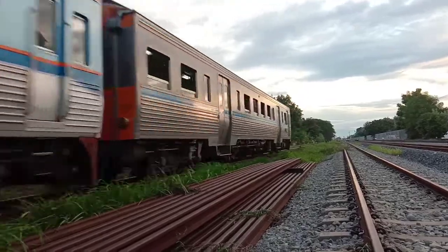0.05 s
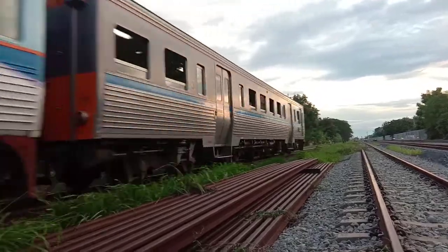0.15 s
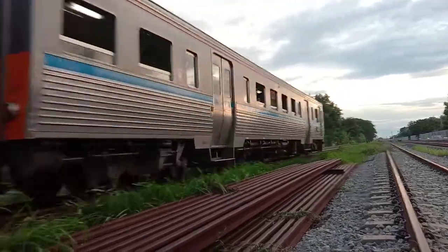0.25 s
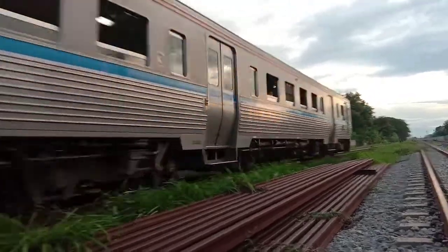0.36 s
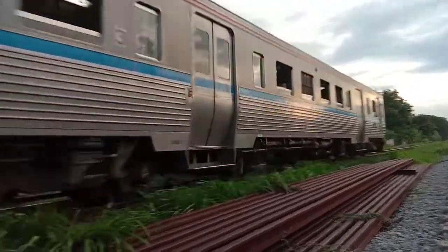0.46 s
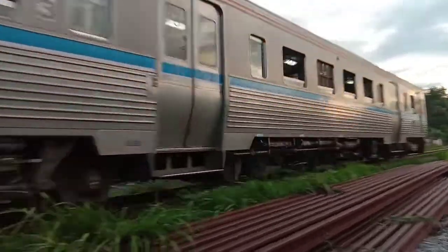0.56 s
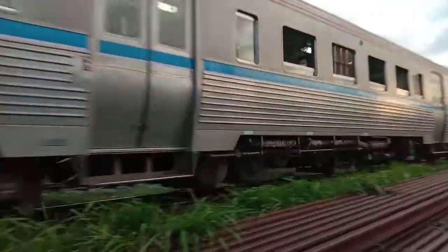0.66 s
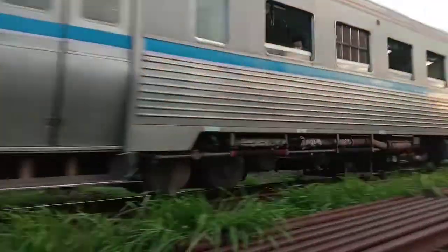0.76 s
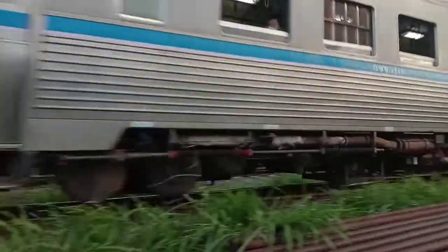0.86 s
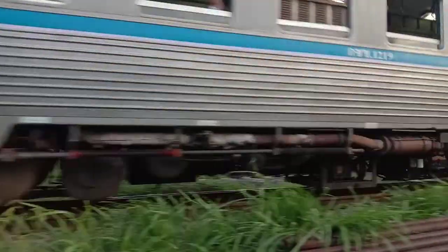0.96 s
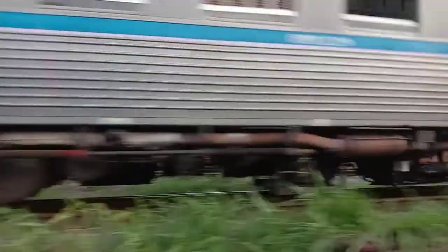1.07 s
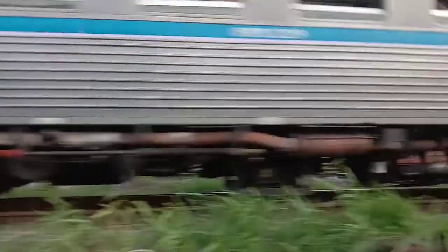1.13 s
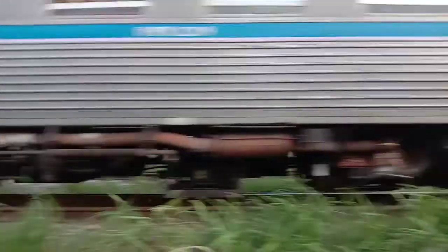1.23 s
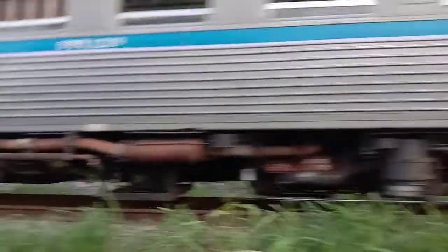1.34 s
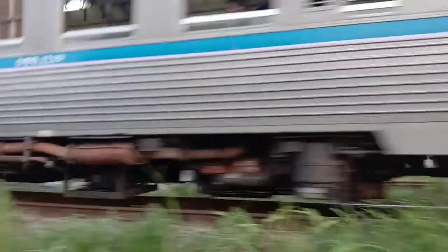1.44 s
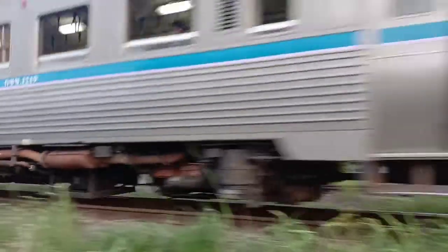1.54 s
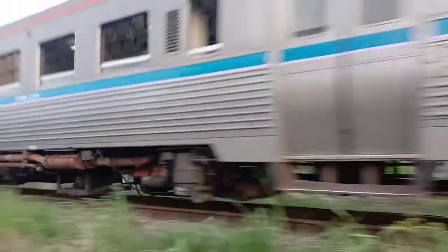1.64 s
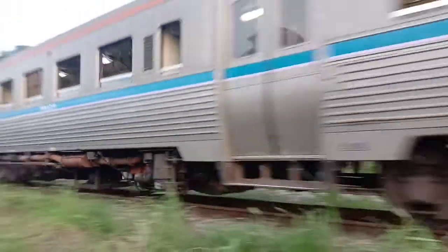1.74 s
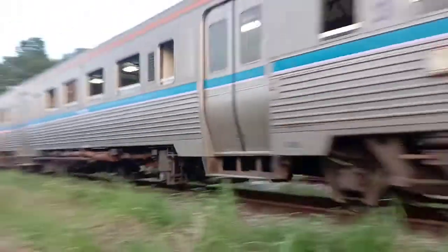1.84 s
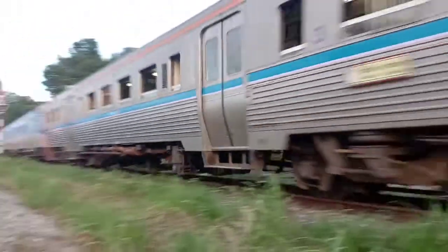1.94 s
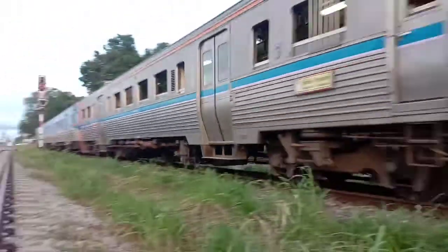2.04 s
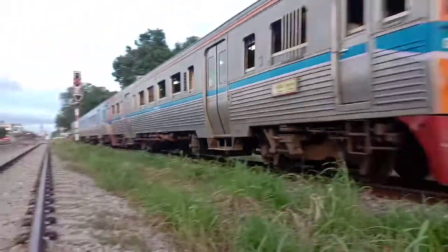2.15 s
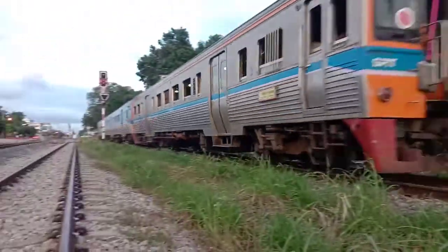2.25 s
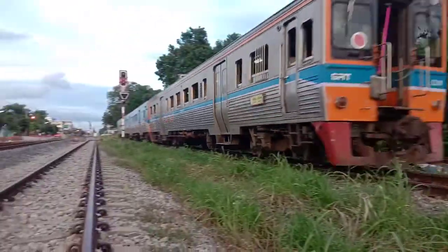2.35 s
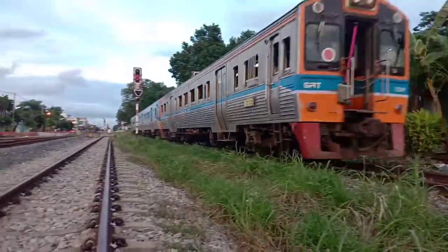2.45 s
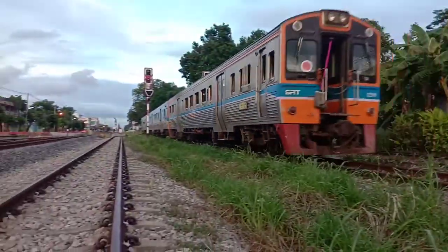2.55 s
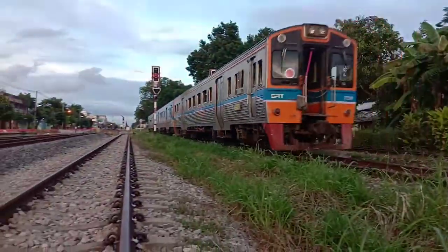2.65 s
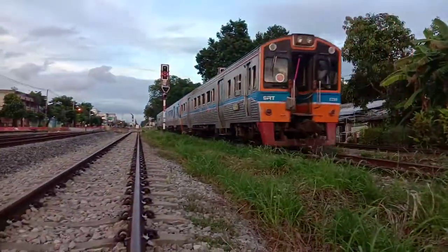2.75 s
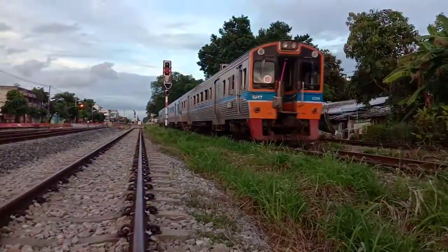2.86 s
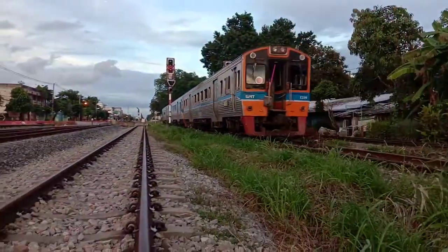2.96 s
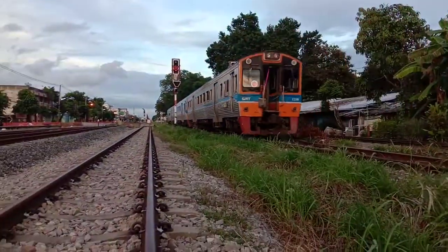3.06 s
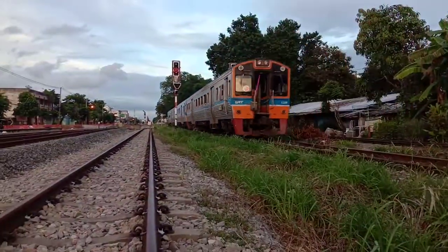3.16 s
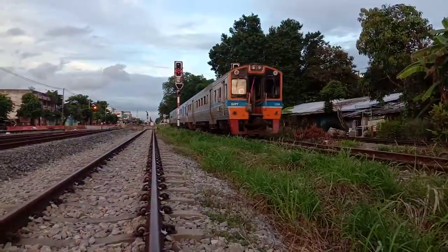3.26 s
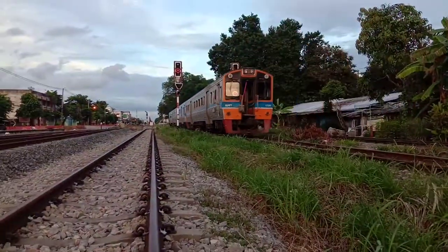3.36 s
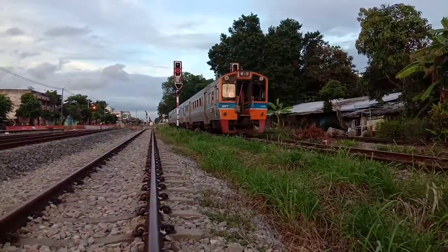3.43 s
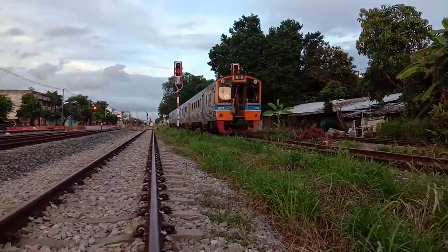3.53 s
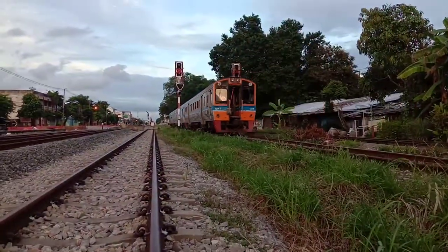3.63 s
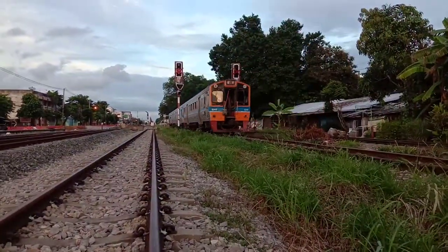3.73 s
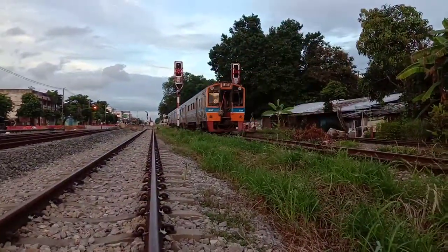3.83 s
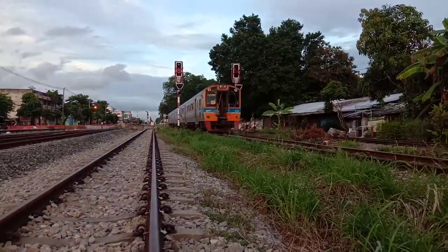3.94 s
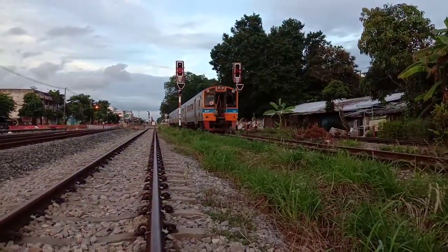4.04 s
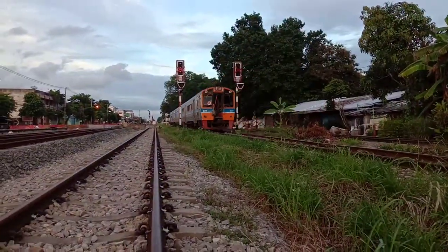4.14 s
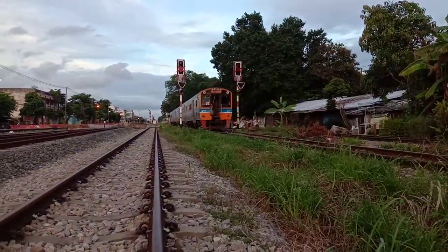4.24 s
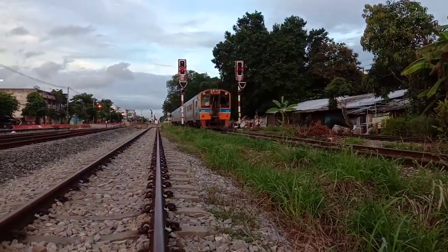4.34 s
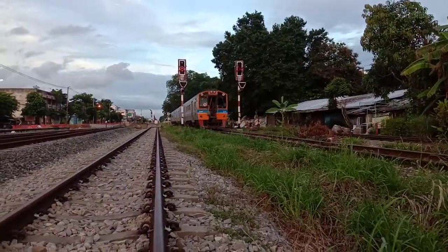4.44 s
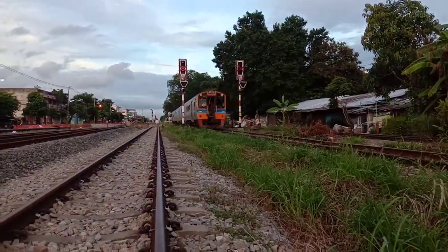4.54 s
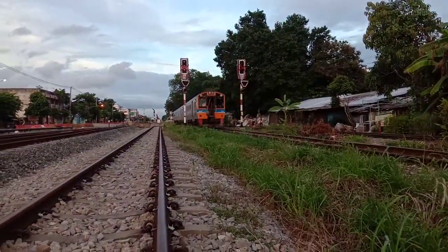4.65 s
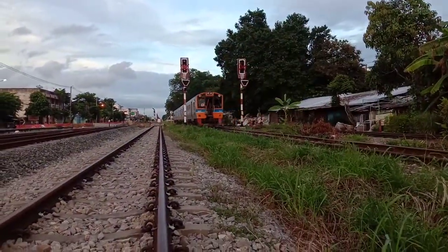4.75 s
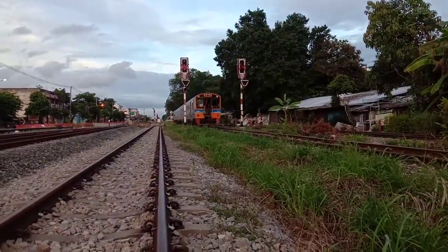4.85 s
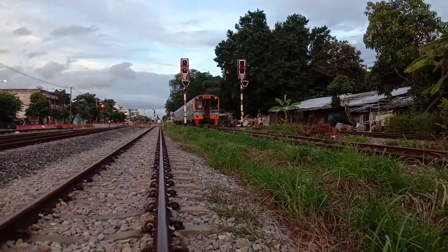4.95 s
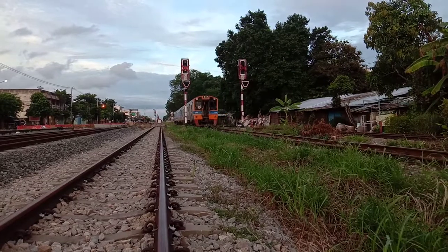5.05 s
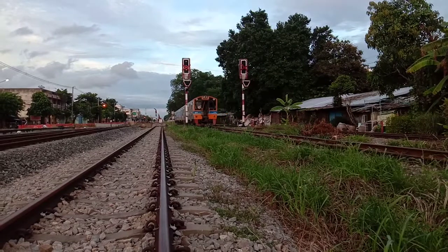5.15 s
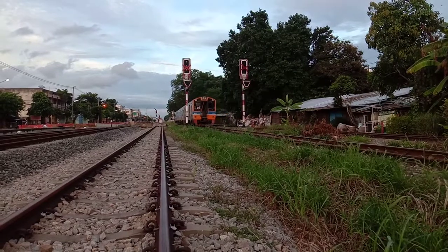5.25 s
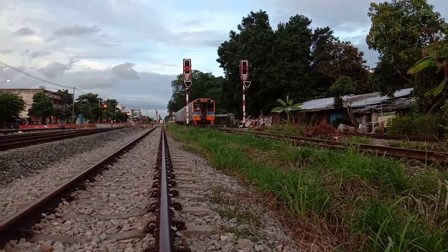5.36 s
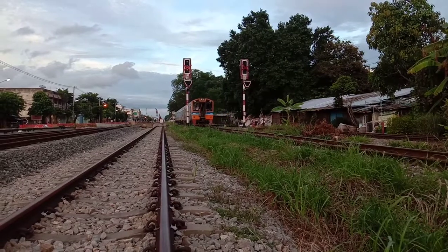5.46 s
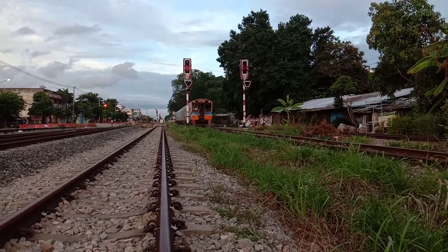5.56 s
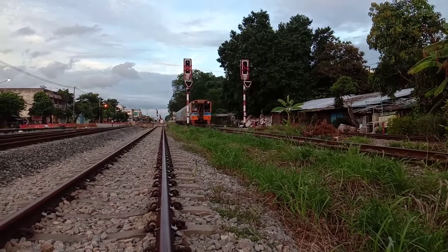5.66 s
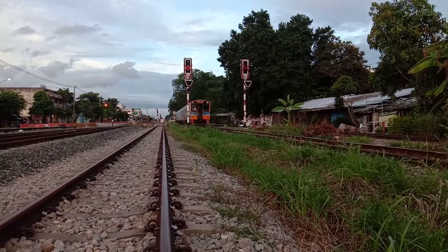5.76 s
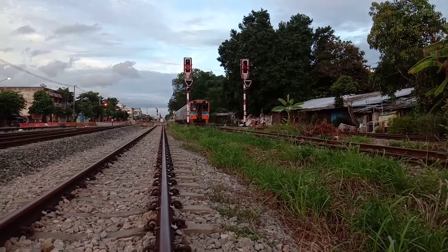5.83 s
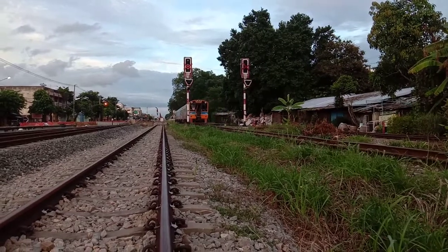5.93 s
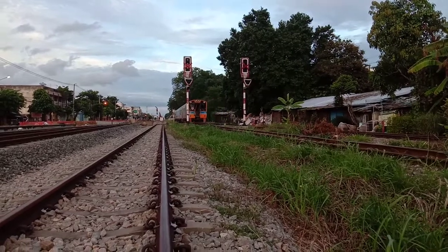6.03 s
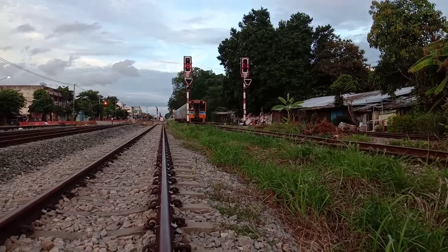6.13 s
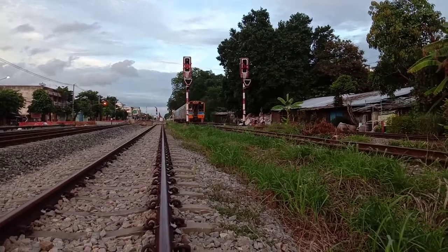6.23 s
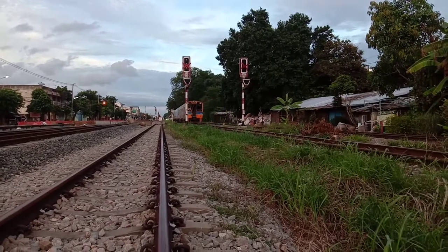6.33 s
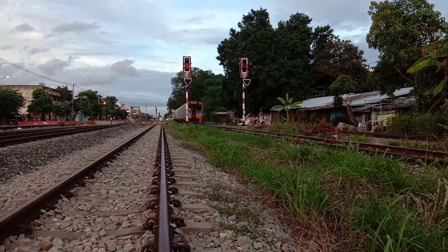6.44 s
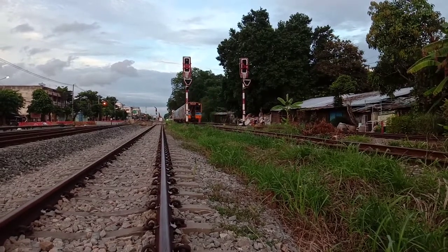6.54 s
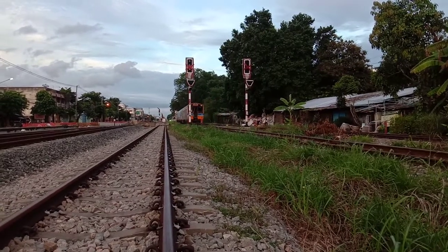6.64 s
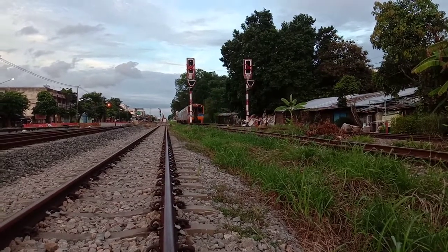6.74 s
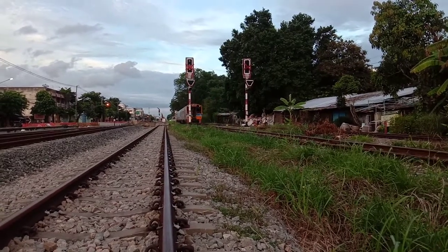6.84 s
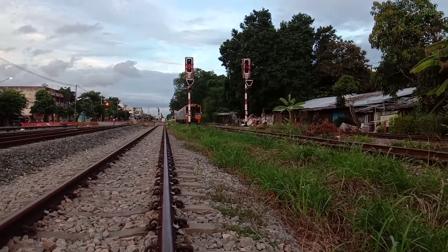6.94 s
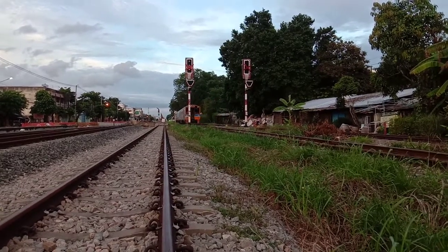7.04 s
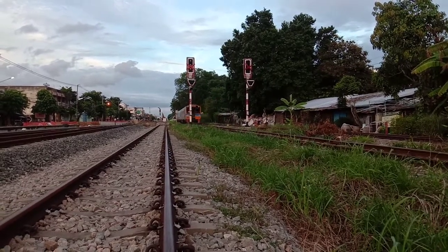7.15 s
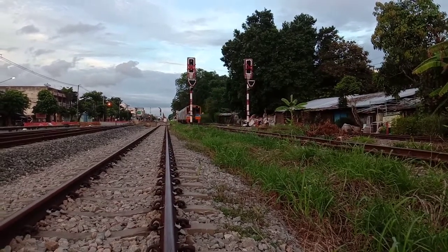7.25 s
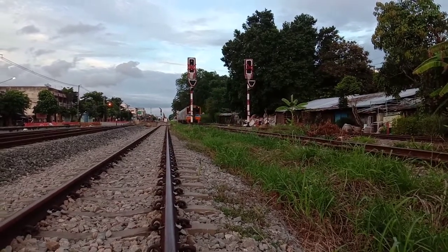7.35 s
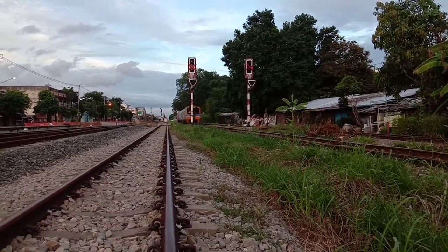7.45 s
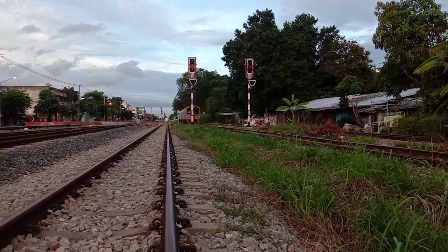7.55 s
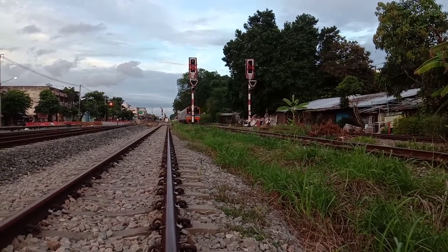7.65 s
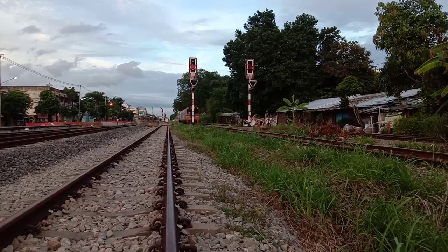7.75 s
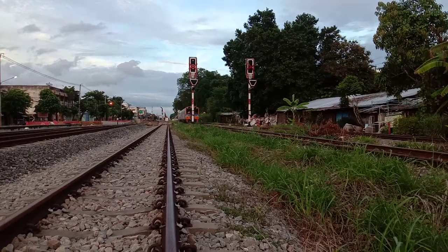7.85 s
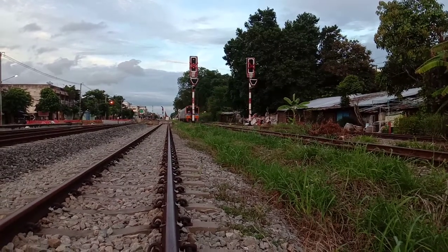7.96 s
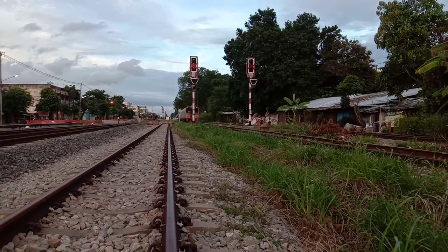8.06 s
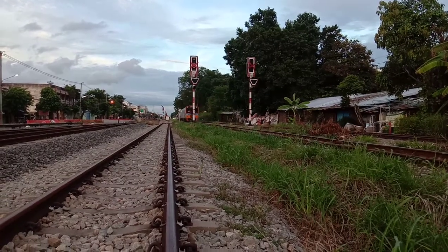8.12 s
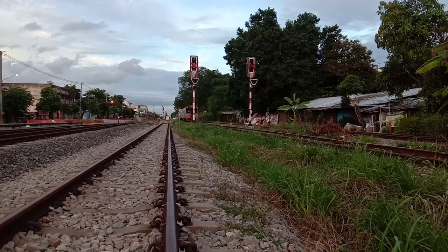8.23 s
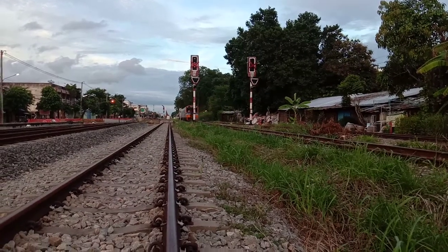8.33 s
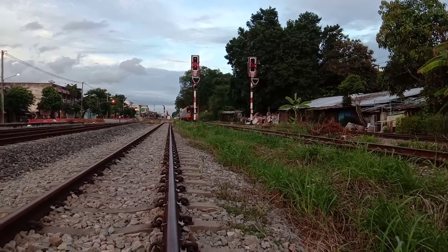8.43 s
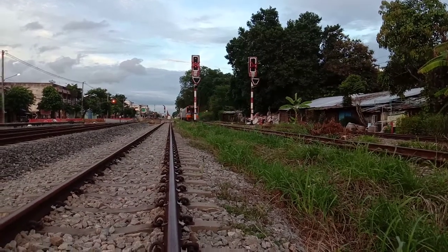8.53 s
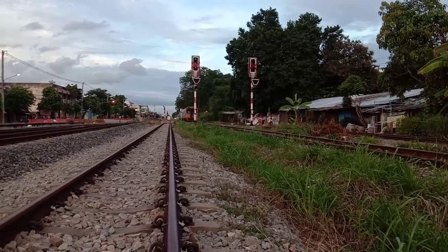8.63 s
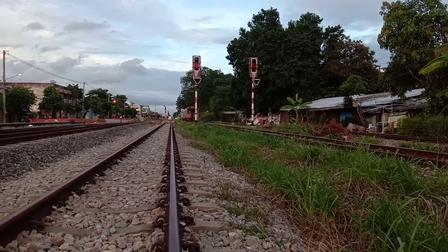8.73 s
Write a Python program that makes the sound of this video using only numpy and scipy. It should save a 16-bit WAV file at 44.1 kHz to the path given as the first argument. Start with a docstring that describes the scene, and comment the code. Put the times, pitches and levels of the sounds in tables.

```python
"""A hard clack of wheels on a rail joint opens the scene, in the close roar of a diesel railcar rolling away.
The roar is filtered noise for rails, car bodies, sleepers, hiss, highest treble and track bed, each with its level.
Joints are short bursts of noise, thumps of the track bed are a few low cycles, and squeals and hums are
sine tones with unsteady pitch. One microphone hears it all, and a limiter holds the hardest blows."""
import sys
import numpy as np
from scipy import signal
from scipy.fft import rfft, irfft, next_fast_len
from scipy.io import wavfile
from scipy.ndimage import uniform_filter1d, minimum_filter1d, map_coordinates

SR = 44100
rng = np.random.default_rng(int(sys.argv[2]) if len(sys.argv) > 2 else 0)


def put_to_file(sound):
    """Save the sound as 16-bit audio at rate SR, in the file named by the first command-line argument."""
    columns = np.atleast_2d(sound).T  # one column per channel
    safe = np.clip(columns, -1, 1)
    whole_steps = np.round(safe * 32767)
    wavfile.write(sys.argv[1], SR, whole_steps.astype(np.int16))


N = 387638  # length in samples
T = np.arange(N) / SR  # time in seconds
HZ = np.fft.rfftfreq(next_fast_len(N + 8192), 1 / SR)  # frequencies at which filters are drawn


def amp(db):
    """Turn decibels into a factor."""
    return 10 ** (np.asarray(db) / 20)


def unit(x):
    """Scale to an rms of 1."""
    return x / np.sqrt(np.mean(x ** 2) + 1e-20)


def gain(points):
    """Draw a filter through (Hz, dB) points on a log frequency axis, with -120 dB outside them."""
    hz, db = np.transpose(points)
    return amp(np.interp(np.log(HZ + 1), np.log(hz + 1), db, left=-120, right=-120))


def filtered(x, response):
    """Multiply the spectrum of a sound by a filter."""
    size = 2 * (len(HZ) - 1)
    return irfft(rfft(x, size) * response, size)[:N]


def wobble(rate, size=N):
    """A smooth random curve with a fresh random value `rate` times a second."""
    knots = rng.standard_normal(int(size * rate / SR) + 4)
    return map_coordinates(knots, [np.arange(size) * rate / SR])


def passing(centre_s, width_s):
    """A bell-shaped rise and fall in time, peaking at 1."""
    return np.exp(-((T - centre_s) / width_s) ** 2)


def fade(middle_s, near, far):
    """Crossfade from the sound alongside to the sound down the line, at even power."""
    angle = np.pi / 4 * (1 + np.tanh((T - middle_s) / 0.42))
    return np.cos(angle) * near + np.sin(angle) * far


def rush(response, patchy_db, flutter_db, shared_db):
    """Noise of rms 1: random patches in time and pitch, an uneven level, then a filter."""
    spectrum = signal.stft(rng.standard_normal(N), nperseg=512)[2]
    patches = uniform_filter1d(rng.standard_normal(spectrum.shape), size=4, axis=0)  # across pitch
    patches = uniform_filter1d(patches, size=8, axis=1)  # across time
    patchy = signal.istft(spectrum * amp(patchy_db * unit(patches)), nperseg=512)[1][:N]
    uneven = patchy * amp(shared_db + flutter_db * wobble(12))
    return unit(filtered(uneven, response))


# How the roll grows and recedes. Each row: time in seconds, level of the rails in dB, level of the car bodies in dB.
ROLL = [(0.0, -21, -22), (0.41, -20, -22), (0.78, -22, -26.5), (1.2, -23, -25.5), (1.54, -24, -23),
        (1.84, -22, -21.5), (2.18, -22.5, -23.5), (2.85, -25.5, -27.5), (3.97, -30.5, -34),
        (4.43, -33, -40), (5.07, -33.5, -41.5), (5.31, -33.5, -34.5), (5.92, -37, -44.5),
        (6.44, -40.5, -51), (6.9, -38.5, -48.5), (7.56, -43, -54.5), (7.98, -42, -45.5), (8.15, -45, -53.5),
        (8.79, -45, -53)]


def roll_levels():
    """Levels of rails and car bodies in dB, as the train passes and recedes."""
    s, rail_db, body_db = np.transpose(ROLL)
    return np.interp(T, s, rail_db), np.interp(T, s, body_db)


# Moments when the level dips briefly. Each row: centre in seconds, change in dB.
DIPS = [(.78, -1.5), (.912, -3.5), (1.115, -4), (1.775, -5), (2.679, -6)]


def bumps():
    """Uneven rail jolts all parts but the track bed at once, and the level dips briefly; in dB."""
    jolts_db = 0.31 * wobble(7.8)
    dips_db = sum(db * passing(s, 0.012) for s, db in DIPS)
    return jolts_db + dips_db


# The ringing pitches of the rail. Each row: centre in Hz, width in Hz, strength in dB.
RAIL_PEAKS = [(1914, 370, -3), (2592, 93, 1.5), (3300, 200, 0.5), (3924, 183, 2.5), (4494, 320, 2.5),
              (5200, 240, 4)]
# The overall tone of the rail. Each row: frequency in Hz, level in dB.
RAIL_SLOPE = [(1300, -13), (1550, -2.5), (2500, 2), (4000, 2), (5200, -2.5), (5800, -20)]


def rail_response(base):
    """The rail rings at its resonances; their power adds to a smooth base."""
    power = base
    for centre_hz, width_hz, db in RAIL_PEAKS:
        power = power + amp(2 * db) / (1 + (2 * (HZ - centre_hz) / width_hz) ** 2)
    return gain(RAIL_SLOPE) * np.sqrt(power)


def rails(rail_db, bumps_db):
    """Rails sing in their resonances; close wheels blur the peaks and sound darker."""
    darker = amp(-3 * np.log2(HZ / 3000 + .01))  # about 3 dB less per octave
    near = rush(rail_response(0.78) * darker, 1.93, 0.74, bumps_db)
    far = rush(rail_response(0.34), 1.23, 0.31, bumps_db)
    return amp(rail_db) * fade(1.87, near, far)


# Tone of the car bodies alongside. Each row: frequency in Hz, level in dB.
BODY_NEAR = [(65, -29), (110, -2.5), (162, 0), (303, -4), (367, -2), (460, -4), (512, -13.5), (540, -17.5),
             (700, -19), (1190, -120)]
# Tone of the car bodies down the line. Each row: frequency in Hz, level in dB.
BODY_FAR = [(65, -33), (110, -7), (184, -5.5), (241, -4), (269, -7.5), (333, -7.5), (393, -18),
            (500, -20.5), (650, -78), (1100, -120)]


def bodies(body_db, bumps_db):
    """Car bodies drone low, with a different tone alongside and down the line."""
    near = rush(gain(BODY_NEAR), 0.89, 0.86, bumps_db)
    far = rush(gain(BODY_FAR), 2.4, 2.0, bumps_db)
    return amp(body_db) * fade(2.67, near, far)


# Tone of the sleepers alongside. Each row: frequency in Hz, level in dB.
SLEEPERS_NEAR = [(310, -48), (520, -14), (932, -3.5), (1150, -6.5), (1240, 1), (1410, -15), (1600, -19),
                 (2080, -49), (3520, -120)]
# Tone of the sleepers down the line, and of joint knocks. Each row: frequency in Hz, level in dB.
SLEEPERS_FAR = [(310, -26), (520, -14), (590, -4.5), (840, 0), (1030, -7), (1130, -6.5), (1220, -1),
                (1260, 1), (1390, -8), (1600, -16), (2080, -34), (3520, -120)]


def sleepers(rail_db, body_db, bumps_db):
    """Sleepers follow a level between rails and bodies; the last wheels alongside shake them hardest."""
    level_db = body_db + .7 * (rail_db - body_db) - 4.5
    last_bogie_db = 4.5 * passing(1.9, .65)
    near = rush(gain(SLEEPERS_NEAR), 1.5, 0.71, bumps_db)
    far = rush(gain(SLEEPERS_FAR), 1.5, 0.69, bumps_db)
    return amp(level_db + last_bogie_db) * fade(1.46, near, far)


def engine_passing():
    """An underfloor engine goes by: a swell from 0 to 1 and back, used to lift the treble."""
    return passing(1.005, 0.64)


# Tone of the hiss alongside. Each row: frequency in Hz, level in dB.
HISS_NEAR = [(2940, -51), (5000, -8.5), (6050, 4.5), (6630, -2.5), (7170, 1.5), (8200, -13), (9500, -30),
             (12400, -65), (20900, -120)]
# Tone of the hiss down the line, and in joint clacks. Each row: frequency in Hz, level in dB.
HISS_FAR = [(3120, -37), (5300, 0), (5730, 5), (6290, 1), (6680, -3), (7190, -1), (8190, -14.5),
            (9500, -20.5), (12400, -41), (20900, -120)]


def hiss(rail_db, bumps_db):
    """Hiss follows the rails, rises with the engine and holds up better than the rails far down the line."""
    far_db = 3.5 * (1 + np.tanh(2 * (T - 3.4))) / 2
    level_db = rail_db - 6.5 + 8 * engine_passing() + far_db
    near = rush(gain(HISS_NEAR), .8, .4, bumps_db)
    far = rush(gain(HISS_FAR), 1.1, .4, bumps_db)
    return amp(level_db) * fade(1.7, near, far)


# Tone of the highest treble, also in joint ticks. Each row: frequency in Hz, level in dB.
AIR = [(5000, -26), (8500, -4), (10000, -9), (11500, -12), (13400, -12), (14900, 0.5), (15500, 1)]


def air(rail_db, bumps_db):
    """The highest treble rises with the engine, and distance eats it away."""
    loss_db = np.clip(5 * (T - 5.2), 0, 10)  # 5 dB a second from 5.2 s, 10 dB at most
    level_db = rail_db - 23 + 12.5 * engine_passing() - loss_db
    return amp(level_db) * rush(gain(AIR), 1.3, 1.3, bumps_db)


# Tone of the track bed. Each row: frequency in Hz, level in dB.
BED = [(18, -58), (30, -24), (51, -16), (70, 1), (91, 1.5), (135, -13), (180, -40), (300, -120)]


def bed():
    """The ground carries its rumble evenly, then lets it fade."""
    level_db = -36.5 - 3 * np.maximum(T - 3.9, 0)  # 3 dB a second from 3.9 s
    return amp(level_db) * rush(gain(BED), 0.93, 2.5, 0)


def rolling():
    """Rough wheels on rough rails shake every part of train and track."""
    rail_db, body_db = roll_levels()
    bumps_db = bumps()
    metal = rails(rail_db, bumps_db) + bodies(body_db, bumps_db)
    treble = hiss(rail_db, bumps_db) + air(rail_db, bumps_db)
    return metal + sleepers(rail_db, body_db, bumps_db) + treble + bed()


def blow(rise_s, t60_s):
    """A blow rises quickly and dies by 60 dB in t60_s seconds."""
    t = np.arange(SR // 2) / SR
    return (1 - np.exp(-t / rise_s)) * amp(-60 * t / t60_s)


def add_at(track, start_s, sound):
    """Mix a short sound into a track at a time in seconds."""
    track[round(start_s * SR):][:len(sound)] += sound


def burst_noise(response):
    """Steady filtered noise of rms 1, to be shaped into blows."""
    return unit(filtered(rng.standard_normal(N), response))


# Wheels on rail joints, mostly two axles of a bogie in turn; levels are taken before the shape of each blow.
# Each row: time in seconds, clack in dB, knock in dB, second blow in dB above the first, treble tick in dB.
JOINTS = [(0.0112, -9.5, -6, -5, -28), (0.9206, -23, -28, 6, -36), (1.0783, -22, -21.5, -8, -25),
          (1.3894, -22, -16, -4, -25), (1.549, -19, -14, -4, -30), (2.518, -20, -17, 0.5, -28),
          (2.6861, -19.5, -10, -0.5, -29), (3.3533, -23, -32.5, -12, -42), (3.5214, -26.5, -27.5, -6, -46),
          (3.851, -20.5, -45.5, -10, -42), (4.024, -22.5, -33, -7.5, -43), (4.6485, -31, -32, -6, -51),
          (4.808, -32, -30, -4, -53), (4.907, -46, -23.5, -8, -66), (5.0604, -27, -57, -4, -47),
          (5.2367, -31, -31.5, -2, -52), (5.5994, -32, -47, -6, -53), (5.7534, -33.5, -55, -1, -56),
          (6.8159, -32, -40, -1, -55), (6.995, -30.5, -38, -4.5, -54), (7.7264, -41.5, -48, 0, -65)]


def joints():
    """Two blows a joint: the first ticks and knocks, the second knocks again and leaves the rail rattling."""
    clack, knock, tick = np.zeros((3, N + SR))
    for first_s, clack_db, knock_db, second_db, tick_db in JOINTS:
        second_s = first_s + 0.016  # from the edge of one rail to the blow on the next
        rattle_s = 0.1 + 0.028 * first_s  # clacks smear out longer as the wheels draw away
        first_clack = 1.15 * blow(.0015, .6 * rattle_s) + .5 * blow(.0004, .025)
        second_clack = .8 * blow(.003, .7 * rattle_s) + .5 * blow(.003, 3 * rattle_s)
        add_at(clack, first_s, amp(clack_db) * first_clack)
        add_at(clack, second_s, amp(clack_db + second_db) * second_clack)
        add_at(knock, first_s, amp(knock_db) * blow(.0015, .3 * rattle_s))
        add_at(knock, second_s, amp(knock_db + second_db) * blow(.003, .5 * rattle_s))
        add_at(tick, first_s, amp(tick_db) * blow(0.00053, 0.04))
    centred = amp(-4 * np.log2(HZ / 3700 + 0.015) ** 2)  # strongest near 3.7 kHz
    steel = rail_response(.05) * centred + 0.42 * gain(HISS_FAR)
    clacks = clack[:N] * burst_noise(steel)
    knocks = knock[:N] * burst_noise(gain(SLEEPERS_FAR))
    ticks = tick[:N] * burst_noise(gain(AIR))
    return clacks + knocks + ticks


# Thumps of the track bed under an axle. Each row: start in seconds, level in dB before the push shape, pitch in Hz.
THUMPS = [(2.499, -15.5, 155), (2.692, -18, 156), (2.698, -13, 272), (4.545, -31, 79), (4.646, -31, 67.3),
          (4.745, -28, 85), (4.805, -20.5, 205), (5.165, -24, 100), (5.485, -33, 95), (5.55, -29, 80),
          (5.75, -22, 86.5), (5.825, -24, 90), (5.91, -25, 100), (6.097, -31, 70.0), (6.277, -33, 83.4),
          (6.821, -31, 86.1), (6.985, -33, 157), (7.147, -25, 85), (7.195, -29, 90), (7.338, -32, 71),
          (7.499, -29.5, 66.5), (7.683, -34, 79), (7.77, -34, 95), (7.955, -35, 250), (8.03, -34, 275),
          (8.1, -36, 232)]


def thumps():
    """A soft push, a few unsteady cycles of the track bed, then it settles."""
    out = np.zeros(N + SR)
    for start_s, db, hz in THUMPS:
        length_s = 0.023 + 2.8 / hz  # a push and a few cycles
        t = np.arange(round(1.5 * length_s * SR)) / SR  # room to die away
        drift = np.cumsum(rng.standard_normal(len(t))) * 0.025
        push = (1 - np.exp(-t / .008)) * np.exp(-(t / (.7 * length_s)) ** 3)
        cycles = np.sin(2 * np.pi * hz * t + drift)
        add_at(out, start_s, amp(db) * push * cycles)
    return out[:N]


# Brief unsteady tones: squeals of wheels and rails, and low hums, some from the engine.
# Each row: start in seconds, length in seconds, first pitch in Hz, last pitch in Hz, level in dB before it wavers.
TONES = [(1.452, 0.072, 4720, 4750, -28), (1.602, 0.065, 4680, 4670, -30), (1.61, 0.31, 385, 360, -20),
         (1.689, 0.55, 2693, 2655, -27), (1.75, 0.77, 149.7, 163, -26.5), (1.93, .55, 428.4, 486.7, -25),
         (2.157, .3, 5700, 5580, -33), (2.28, .05, 8900, 8880, -43), (2.432, 0.055, 4430, 4450, -28),
         (2.796, 0.13, 275, 289, -27.5), (2.8, 0.62, 172.3, 152, -30.5), (2.88, 0.269, 908, 800, -31.5),
         (2.98, .08, 4450, 4420, -33), (3.16, 0.23, 217.6, 213, -33.5), (3.175, .05, 3920, 3900, -31),
         (3.313, .06, 5390, 5400, -32), (5.24, .14, 218.4, 212, -34.5), (5.38, 0.25, 238, 237, -41),
         (6.06, .11, 5320, 5310, -39), (6.28, 0.13, 850, 845, -45.5), (7.678, 0.13, 211, 224, -43.5),
         (8.619, 0.12, 200, 250, -47)]


def tones():
    """Each tone swells and fades while its pitch slides and wanders."""
    out = np.zeros(N + SR)
    for start_s, length_s, first_hz, last_hz, db in TONES:
        wander_hz = 10.1 + .1 * length_s ** 2 * first_hz  # long high tones wander wider
        progress = np.linspace(0, 1, round(length_s * SR))
        slide_hz = first_hz + (last_hz - first_hz) * progress
        hz = slide_hz + wander_hz * wobble(150, size=len(progress))
        level = amp(db + 2.4 * wobble(27.1, size=len(progress)))
        swell = np.abs(np.sin(np.pi * progress)) ** 0.26
        tone = np.sin(2 * np.pi * np.cumsum(hz) / SR)
        add_at(out, start_s, swell * level * tone)
    return out[:N]


def scene():
    """Add up the train and send the same sound to both channels."""
    train = rolling() + joints() + thumps() + tones()
    return np.array([train, train])


def record(dry):
    """One microphone; a limiter that looks ahead holds the peaks; nothing passes above the band limit."""
    needed_gain = np.minimum(1, .64 / (np.abs(dry[0]) + 1e-9))  # keeps peaks to 0.64
    smooth_gain = uniform_filter1d(minimum_filter1d(needed_gain, size=600), size=300)  # sizes in samples
    out = filtered(dry[0] * smooth_gain, HZ < 15650)
    return np.array([out, out])


dry = scene()
out = record(dry)
put_to_file(out)
```